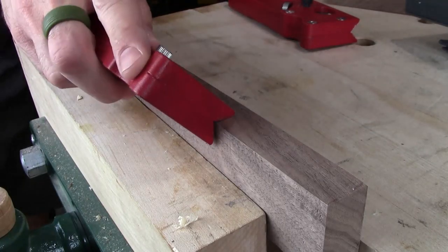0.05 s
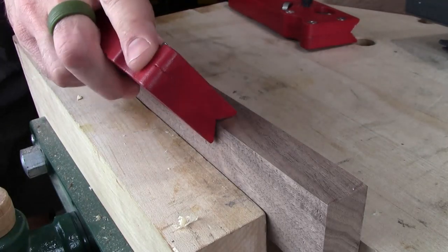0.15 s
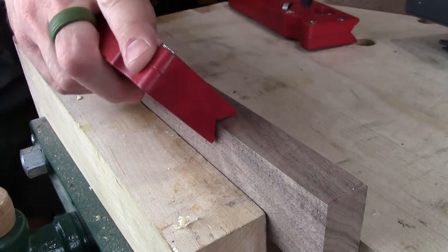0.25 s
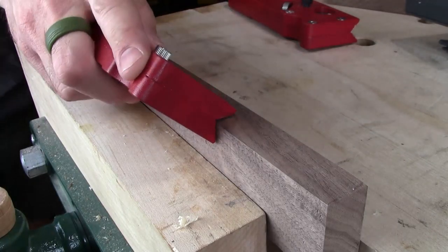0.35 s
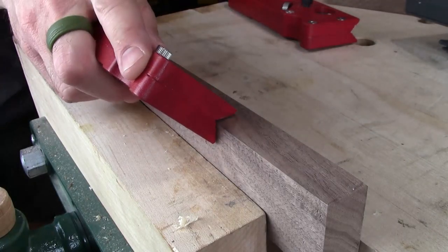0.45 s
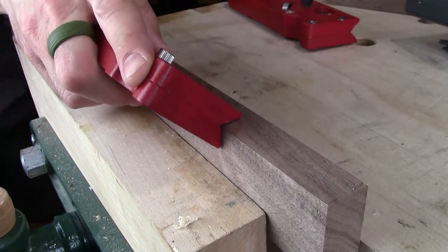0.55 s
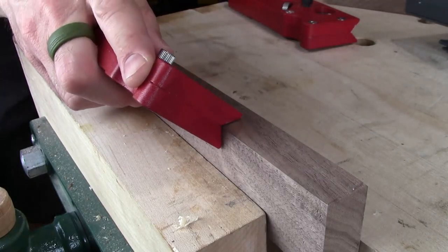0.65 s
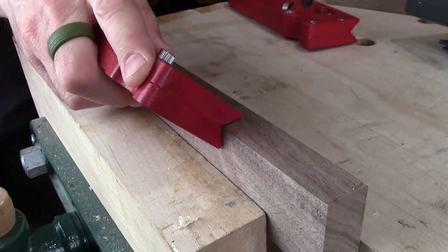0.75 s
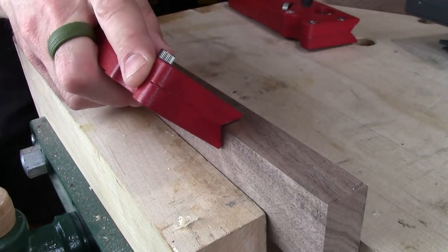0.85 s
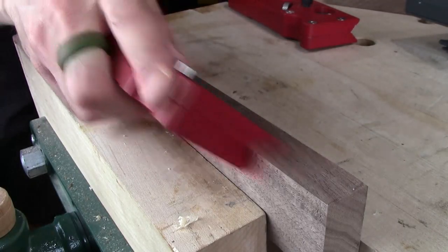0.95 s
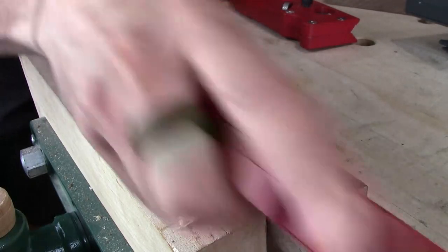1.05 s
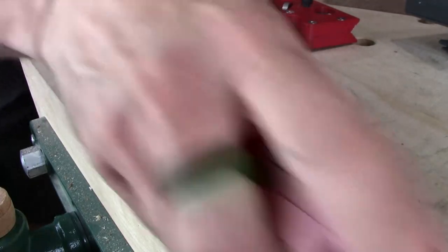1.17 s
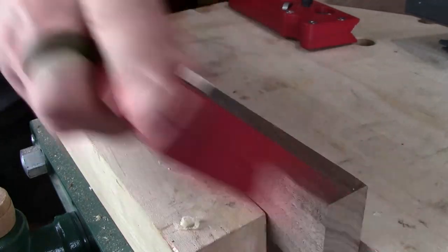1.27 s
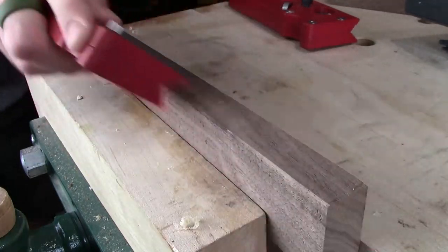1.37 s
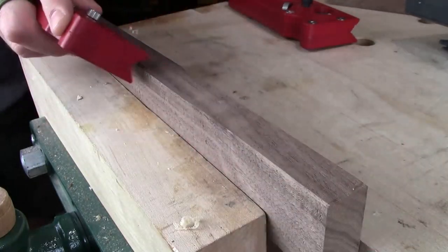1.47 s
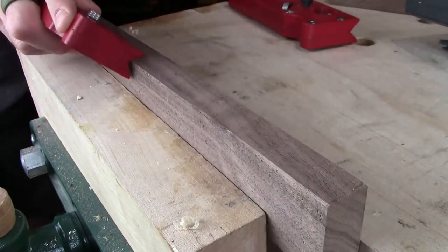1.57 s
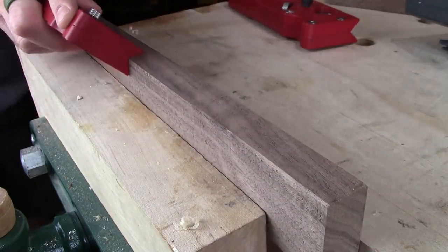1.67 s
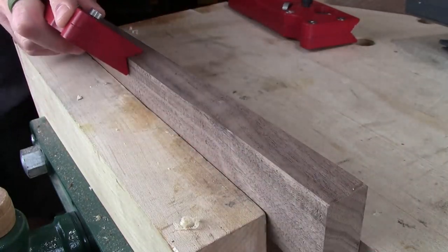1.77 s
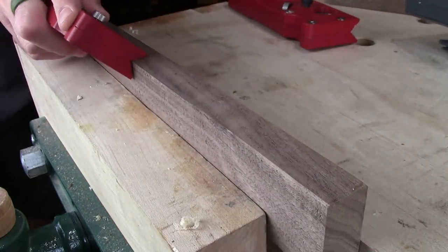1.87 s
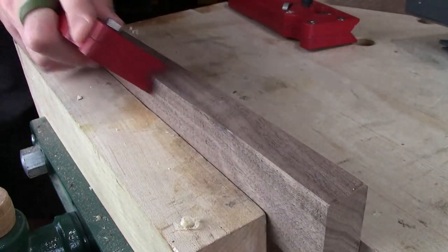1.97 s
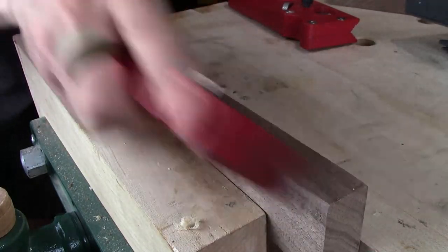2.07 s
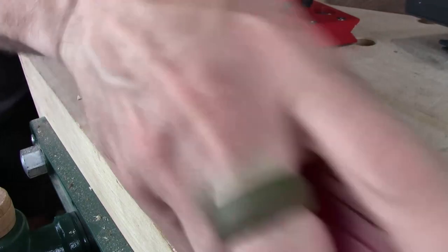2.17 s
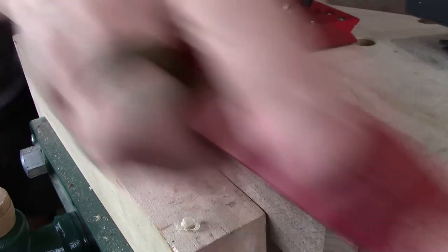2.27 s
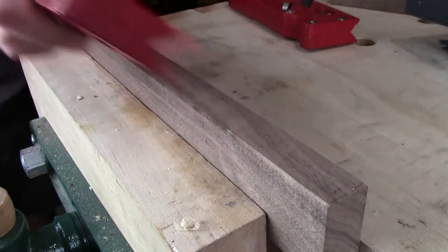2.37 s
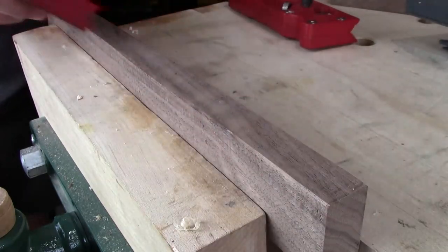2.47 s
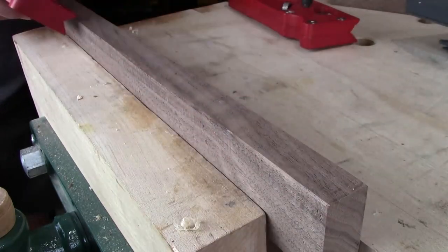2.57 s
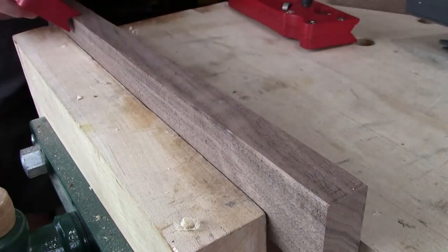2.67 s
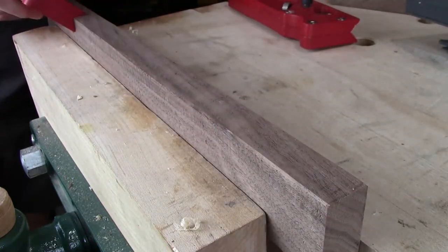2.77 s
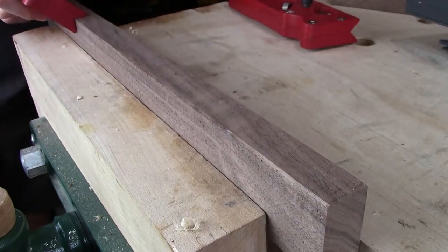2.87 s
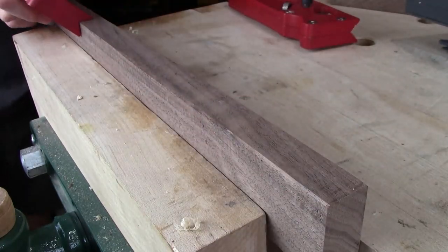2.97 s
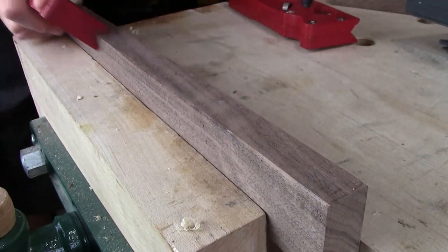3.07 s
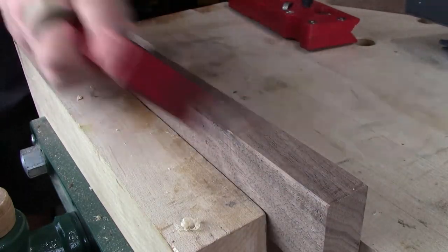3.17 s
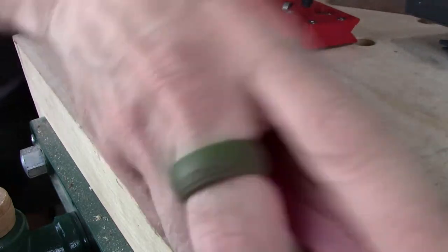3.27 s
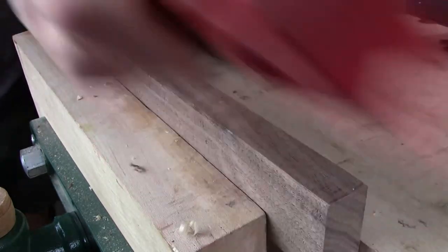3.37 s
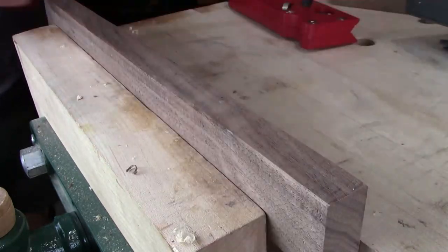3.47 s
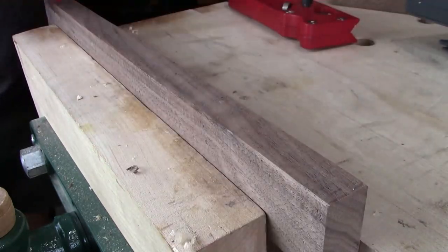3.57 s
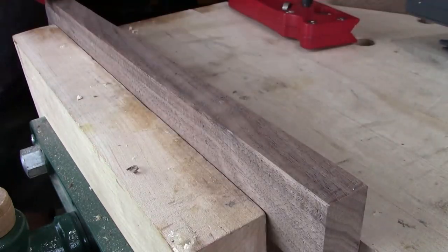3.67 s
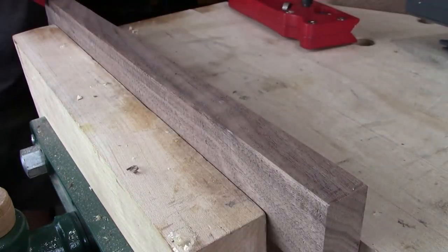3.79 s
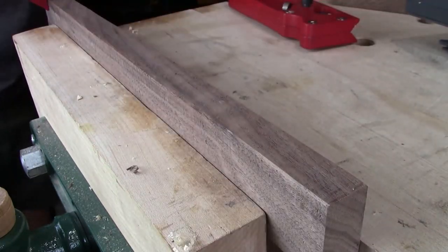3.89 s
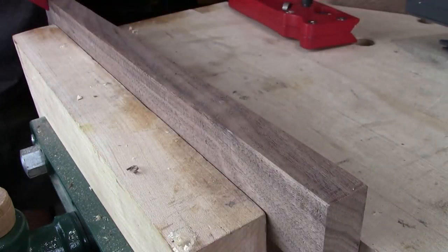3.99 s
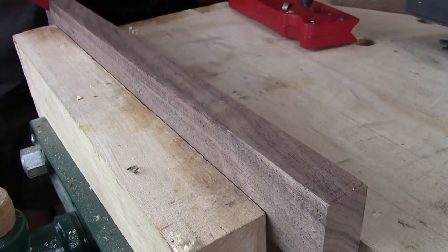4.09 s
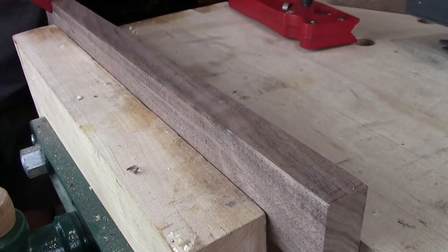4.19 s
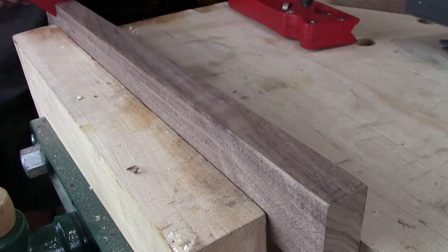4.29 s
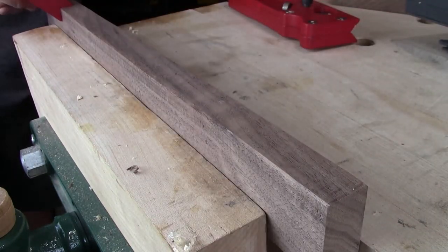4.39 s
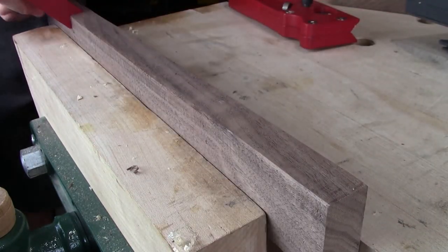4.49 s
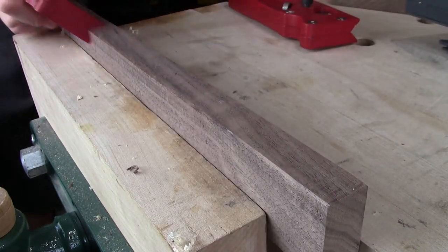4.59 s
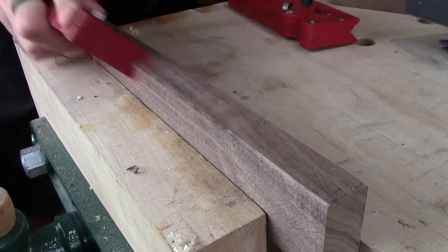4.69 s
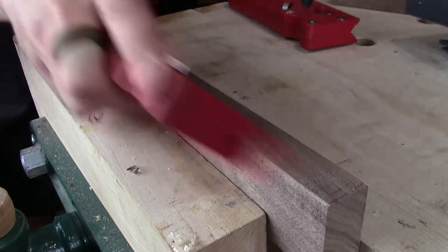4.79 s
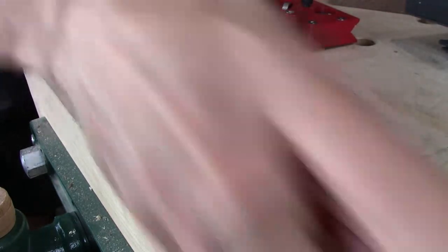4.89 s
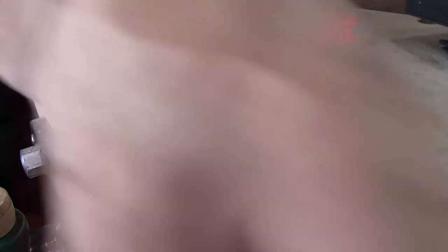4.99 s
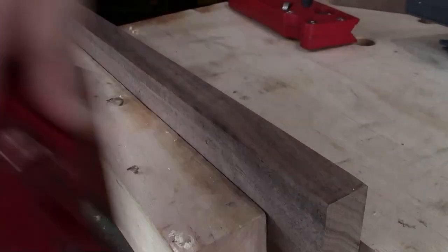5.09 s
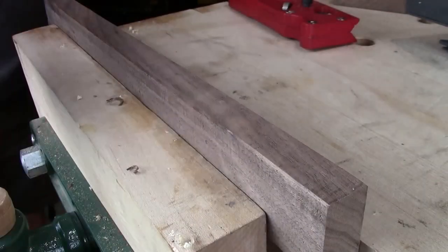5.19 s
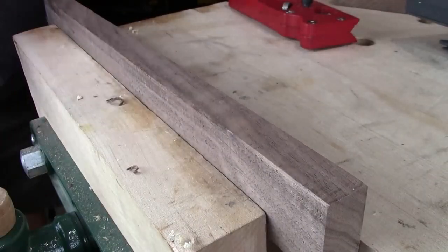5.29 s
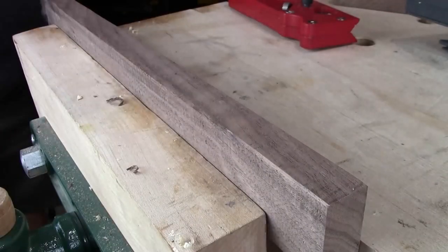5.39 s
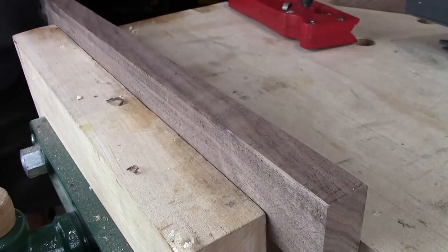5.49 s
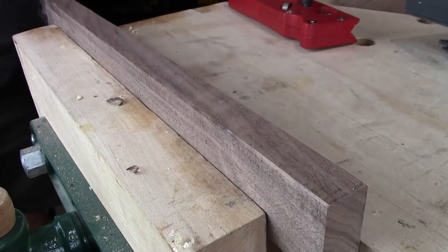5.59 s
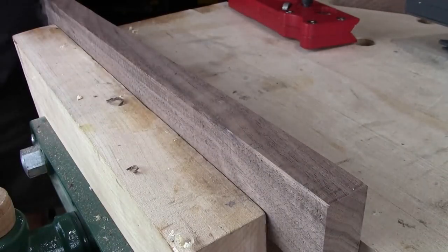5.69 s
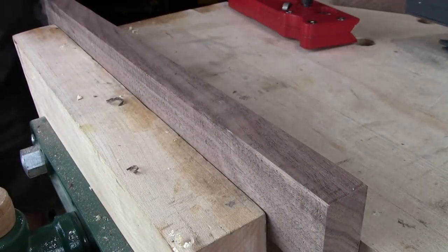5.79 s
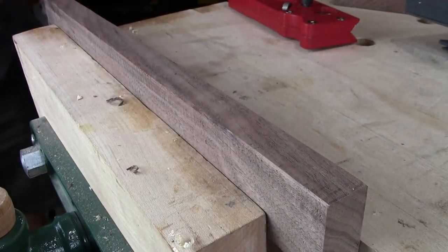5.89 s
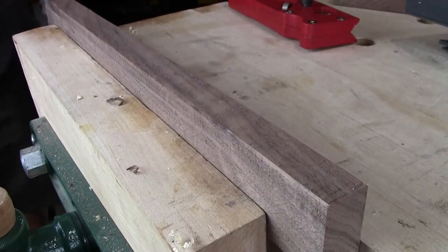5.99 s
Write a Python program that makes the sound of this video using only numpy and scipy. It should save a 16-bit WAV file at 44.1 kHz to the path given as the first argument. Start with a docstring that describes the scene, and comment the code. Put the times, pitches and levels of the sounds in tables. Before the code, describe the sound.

Close stereo microphones at a bench: a cluster of loud knocks and faint rubbing, then a quick dry scrape. More clacks as the plane is repositioned, two further fast scrapes, a pause with a knock, and a longer, gritty final stroke ending in a click. Small taps and a light brush follow in the quiet hum of a small workshop.

```python
"""At a workshop bench, close to the microphones, a small metal edge plane takes four strokes along a
hardwood board clamped in a vice. Tearing fibres shake the board, plane body and blade, which ring at
their modes under broad rasp. Knocks and taps of the plane on wood ring the same board and body, light
brushes hiss, faint echoes follow the bench sounds, and the shop's hum is shaped noise drifting slowly."""
import sys
import numpy as np
from scipy import signal
from scipy.fft import rfft, irfft
from scipy.io import wavfile
from scipy.ndimage import uniform_filter1d

SR = 44100
rng = np.random.default_rng(int(sys.argv[2]) if len(sys.argv) > 2 else 0)


def wav_record(signal):
    """Record a signal, one row per channel, as 16-bit PCM in the file named by sys.argv[1]."""
    frames = np.transpose(np.atleast_2d(signal))
    bounded = np.clip(frames, -1, 1)
    # unit amplitude maps onto the largest positive 16-bit level
    quanta = np.round(bounded * 32767).astype(np.int16)
    wavfile.write(sys.argv[1], SR, quanta)


N = 266584  # length of the scene [samples]

# Modes of board and bench ringing undamped: (frequency [Hz], level [dB], 60 dB decay [s])
BOARD = [(237.5, -11.5, 0.34), (349, -27, 0.98), (467, 13, 0.084), (615, 6, 0.097), (765, 8.5, 0.11),
         (833.6, -3.5, 0.23), (1036, 3.5, 0.11), (1177, 0.5, 0.06)]
# Modes of the plane body ringing undamped: (frequency [Hz], level [dB], 60 dB decay [s])
BODY = [(1219, 14.5, 0.039), (1627, 9.5, 0.054), (1800, 12, 0.065), (1978, -1, 0.25), (2134, 9, 0.062),
        (2400, 13, 0.028), (2650, -6, 0.032), (2794, 8, 0.065), (3210, 12.5, 0.02), (4020, 19, 0.01),
        (4186, 19, 0.015)]


def gain_of(db):
    """Turns decibels into an amplitude factor."""
    return 10 ** (np.asarray(db) / 20)


def evened(x):
    """Scales a signal to rms 1."""
    return x / np.sqrt(np.mean(x ** 2) + 1e-20)


def read(points, hz):
    """Looks a table up on a log-frequency axis."""
    f, value = np.transpose(points)
    return np.interp(np.log(hz + 1), np.log(f + 1), value)


def band(x, lo_hz, hi_hz, colour=((1, 0), (2, 0))):
    """Keeps what lies between two frequencies, in a given spectral colour, at rms 1."""
    hz = np.fft.rfftfreq(len(x), 1 / SR)
    low_edge = 1 + (lo_hz / (hz + 1)) ** 8
    high_edge = 1 + (hz / hi_hz) ** 8
    edges = 1 / np.sqrt(low_edge * high_edge)
    return evened(irfft(rfft(x) * gain_of(read(colour, hz)) * edges, len(x)))


def add(mix, start_s, sound):
    """Mixes a sound in at its start time, cut off at the end of the scene."""
    part = mix[round(start_s * SR):][:len(sound)]
    part += sound[:len(part)]


def hum():
    """The workshop's air noise: random spectra in a fixed colour, with drifting patches and level."""
    # Colour of the air noise: (frequency [Hz], relative spectral level [dB])
    hum_colour = [(18, -83), (30, -63), (64, -21), (103, -15.5), (120, -13), (214, -5), (250, 3),
                  (285, -9.5), (316, -2.5), (534, -8.5), (833, -9), (1480, -16), (3700, -26), (9500, -40),
                  (15600, -48)]
    # Slow drift of the hum: (time [s], level [dB])
    hum_level = [(0.0, -35.5), (1.9, -32.5), (2.6, -36.5), (4.2, -34.5), (5.28, -37), (6.04, -35.5)]
    # Likeness of the left and right microphones: (frequency [Hz], correlation [-1 to 1])
    likeness = [(60, 0.85), (180, 0.93), (550, 0.97), (1650, 0.98), (4970, 0.92), (15000, 0.37)]
    frames, hz = N // 256 + 5, np.fft.rfftfreq(1024, 1 / SR)
    a, b, c, d, patches = rng.standard_normal((frames, 513, 5)).T
    patches = uniform_filter1d(patches, 10, 0)  # along frequency
    patches = evened(uniform_filter1d(patches, 12, 1))  # along time
    same = np.clip(read(likeness, hz), -1, 1)[:, None]
    left = a + 1j * b
    right = same * left + np.sqrt(1 - same ** 2) * (c + 1j * d)
    spectra = np.array([left, right]) * gain_of(read(hum_colour, hz)[:, None] + 1.2 * patches)
    air = signal.istft(spectra, nperseg=1024, noverlap=768)[1][:, :N]
    level_db = np.interp(np.arange(N) / SR, *np.transpose(hum_level))
    return gain_of(level_db) * evened(air)


def shop(x):
    """Sparse echoes of random sign, each band dying at its own speed; the two sides differ a little."""
    # Echo decay: (frequency [Hz], 60 dB decay [s])
    echo_decay = [(200, 0.4), (1000, 0.2), (4000, 0.16), (12000, 0.14)]
    taps = np.zeros((2, SR // 2))
    # One echo at random in every 20 samples
    at = np.arange(200, SR // 2 - 20, 20) + rng.integers(0, 20, (2, (SR // 2 - 201) // 20))
    np.put_along_axis(taps, at, rng.choice([-1., 1.], at.shape), 1)
    shared, side = taps
    taps = shared + 0.14 * side * np.array([[1], [-1]])
    hz, t, z = signal.stft(taps, SR, nperseg=256)
    fade = gain_of(-60 * t / read(echo_decay, hz)[:, None])
    tail = signal.istft(z * fade, SR, nperseg=256)[1]
    return signal.fftconvolve(x[None], tail / np.linalg.norm(tail[0]), axes=1)[:, :N]


def rasp(x, lo_hz, hi_hz):
    """Gives noise the broad airborne colour of tearing wood between two frequencies."""
    # Colour of the rasp: (frequency [Hz], relative spectral level [dB])
    tear_colour = [(88, -51), (150, -25), (226, -5.5), (396, -7), (463, 0.5), (897, -10), (1030, -3.5),
                   (1110, -8), (2280, -7), (5160, -11.5), (9800, -19.5), (15600, -30.5)]
    return band(x, lo_hz, hi_hz, tear_colour)


def fibres(count, per_s, spread_db):
    """Fibres snap at random moments, mostly small, a few large, their strength in loose clumps."""
    clump = gain_of(1.7 * evened(uniform_filter1d(rng.standard_normal(count), 300)))
    size = gain_of(spread_db * np.minimum(rng.exponential(1, count), 5))
    size = size * rng.choice([-1, 1], count)
    snaps = rng.random(count) < per_s / SR
    return evened(size * clump * snaps)


def ring(modes, damping, weights=1):
    """The dying tones, one a row, of a pushed object; damping multiplies each decay time."""
    hz, db, t60 = np.transpose(modes)[:, :, None]
    t = np.arange(SR // 3) / SR
    return weights * gain_of(db - 60 * t / (t60 * damping)) * np.sin(2 * np.pi * hz * t)


def near(hz, octaves, damping):
    """The ring of board and body when a contact favours the modes near one pitch."""
    distance = np.log2(np.array(BOARD + BODY)[:, :1] / hz) / max(octaves, .15)
    sign = (-1) ** np.arange(len(distance))[:, None]
    return ring(BOARD + BODY, damping, sign / (1 + distance ** 2) ** 1.25).sum(0)


def brush(start_s, length_s, hiss_db):
    """A thin dry hiss swells and fades as something slides lightly over the wood."""
    count = round(length_s * SR)
    hiss = rasp(fibres(count, per_s=5000, spread_db=3.0), 2800, 16000)
    return start_s, gain_of(hiss_db) * hiss * np.hanning(count)


def knock(start_s, blow_db, contact_hz, octaves, tick_db, rattle_db, rattle_hz, rattle_octaves):
    """A blow rings modes near its contact pitch, with crack and tick; the sole rattles until it sits."""
    rattle_s = 0.053  # how long the rattle lasts
    t = np.arange(SR // 3) / SR
    rise = 1 - np.exp(-(t / 0.00093) ** 2)
    rung = near(contact_hz, octaves, damping=0.46)
    crack, tick, rattle = rng.standard_normal((3, len(t)))

    crack = band(crack, contact_hz / 2 ** octaves, contact_hz * 2 ** octaves)
    crack = crack * gain_of(-9 - 60 * t / .035)

    # The tick dies fast at first, then along a weaker, longer tail
    tick = rasp(tick, 2300, 14000) * (gain_of(-60 * t / 0.039) + gain_of(-15 - 60 * t / 0.31))
    top_ping = ring(BODY[-1:], 2.5)[0] / gain_of(BODY[-1][1])  # the highest body mode
    tick = tick + gain_of(3) * top_ping

    rattle = rattle * (1 - np.exp(-t / 0.00067)) * np.exp(-(t / rattle_s) ** 3)
    rattle = signal.fftconvolve(rattle, near(rattle_hz, rattle_octaves, damping=0.34))[:len(t)]
    rattle = rattle / np.sqrt(np.mean(rattle[:round(rattle_s * SR)] ** 2))

    blow = gain_of(blow_db) * (rung / abs(rung).max() + crack) + gain_of(tick_db) * tick
    return start_s, rise * blow + gain_of(rattle_db) * rattle


def shaken(modes, bite_db, damping, lo_hz, hi_hz, rasp_db):
    """A part rings at its modes, each swaying as the grip shifts; a deep bite adds broad rasp."""
    count = len(bite_db)
    force, tearing = (fibres(count, per_s=9000, spread_db=3.0) for _ in range(2))
    grip = uniform_filter1d(rng.standard_normal((len(modes), count)), 4000, axis=1)
    sign = (-1) ** np.arange(len(modes))[:, None]
    sway = gain_of(3.5 * evened(grip)) * sign
    tones = signal.fftconvolve(force[None], ring(modes, damping), axes=1)[:, :count]
    rung = band((tones * sway).sum(0), lo_hz, hi_hz)
    share = gain_of(rasp_db + .45 * bite_db)  # rasp against ring
    return (rung + share * rasp(tearing, lo_hz, hi_hz)) / np.sqrt(1 + share ** 2)


def stroke(rows, swish_hz, end_s, end_boom_db):
    """Tearing at the edge drives board, body and blade; the hand damps the ring of board and body."""
    # Modes of the blade before the grip favours a pitch: (frequency [Hz], level [dB], 60 dB decay [s])
    blade_modes = [(5650, -6, .01), (6480, 1, .008), (7620, -1, .008), (8400, -2, .008), (9890, 2, .005),
                   (12400, -8, .007)]
    boom_db, end_width_s = -1.5, 0.045  # board against body, and half-width of its swell near the free end
    hiss_db, hiss_follows = -6.5, 0.27  # the blade's lower hiss follows the top hiss by this share
    swish_db_per_octave = 20  # fall of the other blade modes away from the favoured pitch
    s, *columns = np.transpose(rows)
    t = np.arange(s[0], s[-1], 1 / SR)
    cut_db, top_db = (np.interp(t, s, c) for c in columns)
    board_db = boom_db + end_boom_db / (1 + ((t - end_s) / end_width_s) ** 2)
    low_hiss_db = hiss_db + hiss_follows * top_db
    bite_db = cut_db + 25

    board = gain_of(board_db) * shaken(BOARD, bite_db, .6, 190, 1300, rasp_db=2)
    body = shaken(BODY, bite_db, .6, 1300, 4800, rasp_db=3)
    gripped = [(hz, db - swish_db_per_octave * abs(np.log2(hz / swish_hz)), t60)
               for hz, db, t60 in blade_modes]
    blade = shaken(gripped, bite_db, 1, 4800, 16000, rasp_db=2.5)
    low_hiss = gain_of(low_hiss_db) * band(blade, 4800, 8900)
    top_hiss = gain_of(top_db) * band(blade, 8900, 16000)

    cut = gain_of(cut_db) * (board + body + low_hiss + top_hiss)
    return s[0], cut * signal.windows.tukey(len(t), .1)


def bench_work():
    """Lays out knocks, strokes and brushes in time; small parts radiate no deep bass."""
    # Light brushes on the wood: (start [s], length [s], hiss level [dB])
    brushes = [(.18, 0.038, -51), (0.253, 0.058, -55), (0.547, 0.099, -48), (5.111, 0.01, -46),
               (5.234, 0.011, -47), (5.534, .12, -48.5)]
    # Knocks of the plane on wood: (time [s], blow level [dB], favoured pitch [Hz], spread [octaves],
    # tick level [dB], settling rattle level [dB], rattle pitch [Hz], rattle spread [octaves])
    knocks = [(.001, -15, 794, 0.59, -40, -27, 690, 0.78), (.029, -1.5, 1760, 0.52, -27, -28.5, 1770, 0.54),
              (.110, 5.5, 880, 1.11, -37, -18, 910, 0.37), (.881, -24.5, 2980, 0.36, -52, -60, 3070, .5),
              (1.637, -17.5, 640, 1.2, -41, -30, 730, .97), (1.804, 0.5, 1140, 1.54, -38, -15, 1020, 0.14),
              (2.196, -2.5, 2700, 0.57, -41, -24, 467, 0.18), (2.705, -22, 500, 0.9, -45, -34.5, 515, 0.82),
              (2.794, -15, 643, 0.83, -45, -30, 800, 0.44), (2.943, 1.5, 2170, 0.6, -42, -16.5, 850, 1.6),
              (3.293, -0.5, 554, 0.8, -46, -29, 470, .65), (3.649, -30, 800, .7, -60, -55, 500, .55),
              (3.925, -7.5, 1210, 0.5, -39, -20.5, 634, 0.85),
              (4.448, -34, 2300, 0.29, -44, -26.5, 213, 0.39),
              (4.536, -21, 2500, 0.55, -26.5, -30.5, 470, .46),
              (4.934, -0.5, 2710, 0.25, -42, -50, 2380, .5), (5.146, -9, 1060, 0.65, -24, -38.5, 1840, 1.1),
              (5.265, -21.5, 1050, .55, -55, -50, 840, .5)]
    # One table a stroke: (time [s], level of the cut [dB], top hiss relative to the cut [dB])
    strokes = [
        [(.95, -64, -22), (.986, -36.5, -10), (1.034, -21.5, -15), (1.112, -17.5, -3.5), (1.13, -23, -22),
         (1.164, -30, -16), (1.26, -52, -40)],
        [(1.88, -55, -7), (1.928, -46.5, -8), (2.096, -22.5, -9.5), (2.19, -20, -18), (2.215, -25, -12),
         (2.298, -48, -34), (2.32, -56, -28)],
        [(2.99, -33, -25), (3.046, -37.5, -13), (3.124, -29, -7.5), (3.204, -20.5, -9), (3.27, -22, -12.5),
         (3.314, -18.5, -21), (3.33, -26, -21), (3.44, -57, -33)],
        [(4.1, -60, -14), (4.254, -40, -23), (4.44, -36.5, -11.5), (4.52, -30.5, -9.5), (4.648, -25.5, -11),
         (4.7, -28, -17), (4.782, -24, -11.5), (4.92, -22, -16), (4.95, -25.5, -18), (5.02, -31.5, -32),
         (5.08, -57, -31)],
    ]
    # Blade pitch that each stroke's grip favours: one column (frequency [Hz])
    swish_pitches = [9000, 9900, 10000, 6200]
    # Each stroke nears the free end of the board: (time [s], added board boom [dB])
    board_ends = [(1.14, 2.5), (2.17, 5.5), (3.3, 9.5), (4.88, 8.5)]
    work = np.zeros(N)
    for row in knocks:
        add(work, *knock(*row))
    for rows, swish_hz, end in zip(strokes, swish_pitches, board_ends):
        add(work, *stroke(rows, swish_hz, *end))
    for row in brushes:
        add(work, *brush(*row))
    bass_cut = signal.butter(4, 190, "high", fs=SR, output="sos")
    return signal.sosfilt(bass_cut, work)


def scene():
    """The bench sounds close to two microphones, their echoes, and the hum."""
    # Balance of the bench sounds: (frequency [Hz], left over right [dB])
    lean = [(60, -8), (180, 1.5), (550, -2), (1650, 0.5), (4970, 0.0), (15000, -0.5)]
    work = bench_work()
    lean_db = read(lean, np.fft.rfftfreq(N, 1 / SR)) * [[.5], [-.5]]
    # A slope added left and taken off right: treble reaches the left microphone a little sooner
    skew = gain_of(-30.5) * work.std() * band(np.gradient(work), 3600, 14800)
    near_sound = irfft(rfft(work) * gain_of(lean_db), N) + skew * [[1], [-1]]
    return near_sound + gain_of(-11.0) * shop(work) + hum()


def record(dry):
    """The loudest blows round off against full scale; then a bass cut and the band limit."""
    edge_hz = 15770  # upper band limit
    held = dry / (1 + abs(dry) ** 6) ** (1 / 6)
    held = signal.sosfilt(signal.butter(2, 60, "high", fs=SR, output="sos"), held)
    low_pass = signal.firwin(511, edge_hz, window=("kaiser", 9), fs=SR)
    return signal.oaconvolve(held, low_pass[None], "same")


dry = scene()
out = record(dry)
wav_record(out)
```